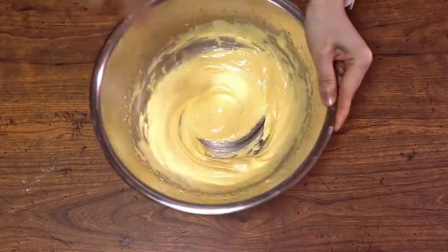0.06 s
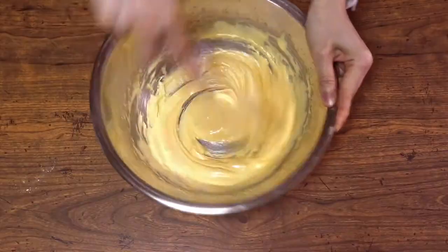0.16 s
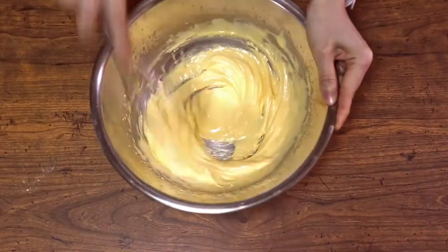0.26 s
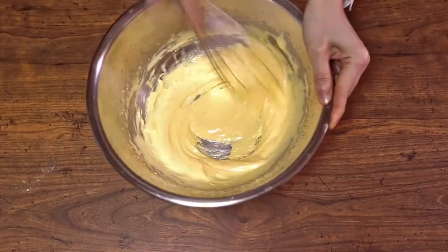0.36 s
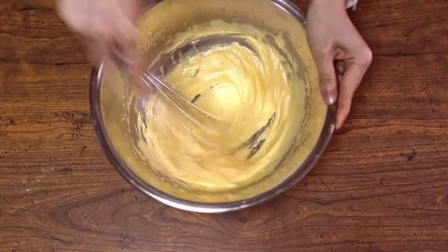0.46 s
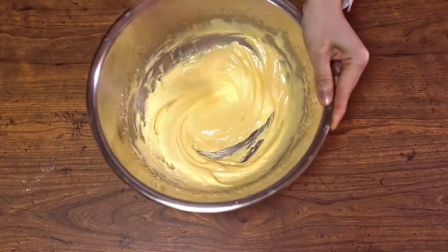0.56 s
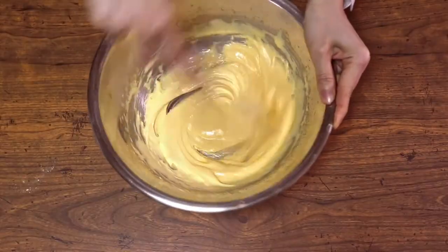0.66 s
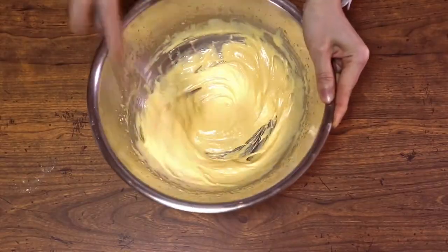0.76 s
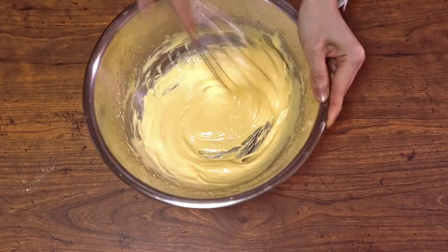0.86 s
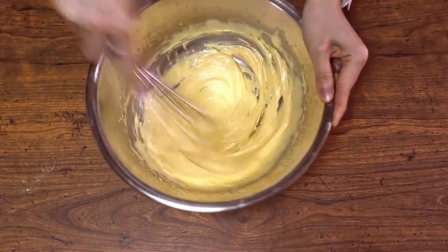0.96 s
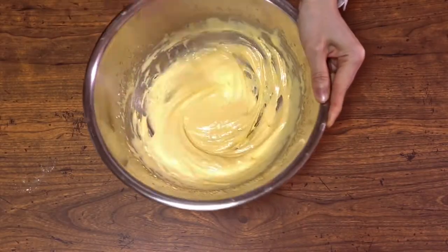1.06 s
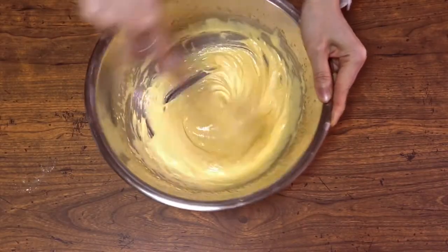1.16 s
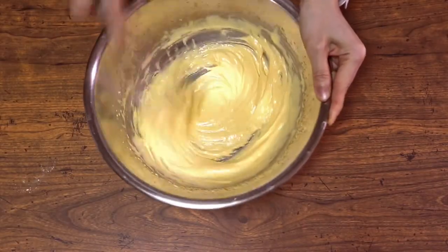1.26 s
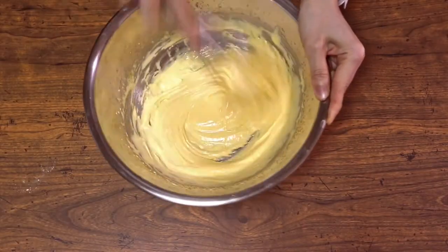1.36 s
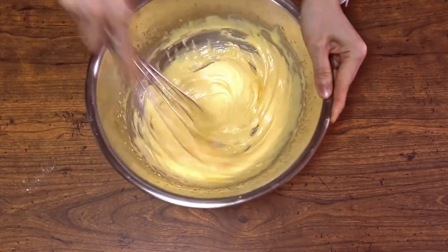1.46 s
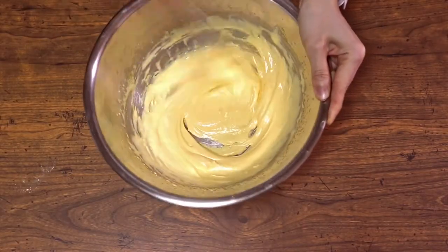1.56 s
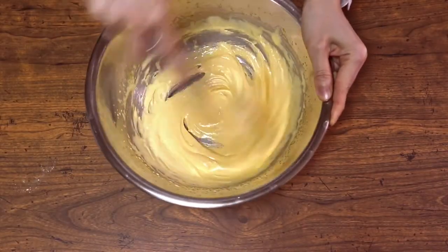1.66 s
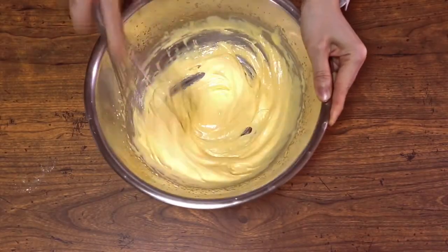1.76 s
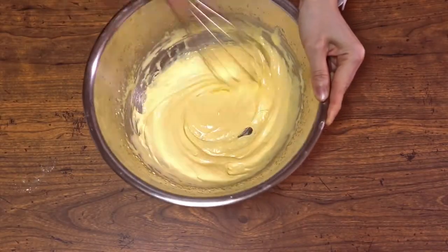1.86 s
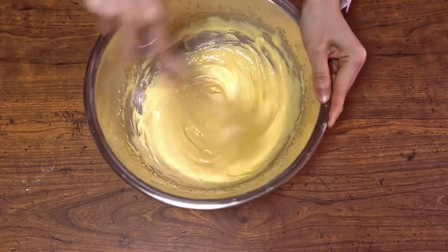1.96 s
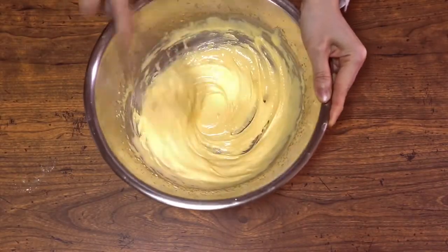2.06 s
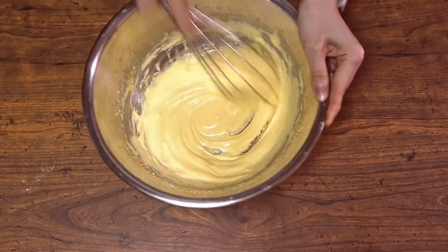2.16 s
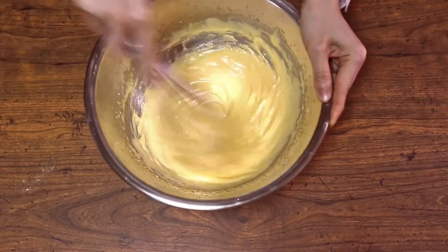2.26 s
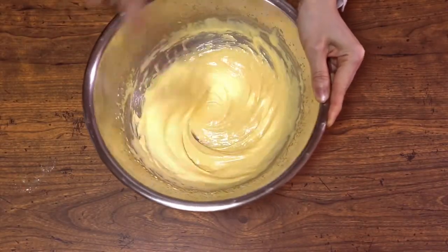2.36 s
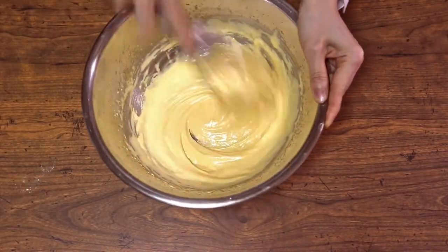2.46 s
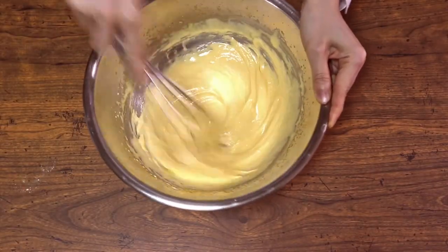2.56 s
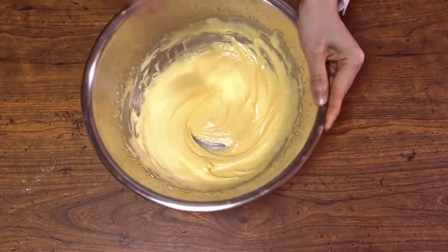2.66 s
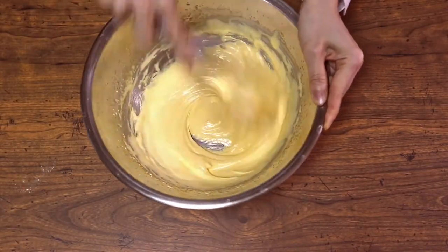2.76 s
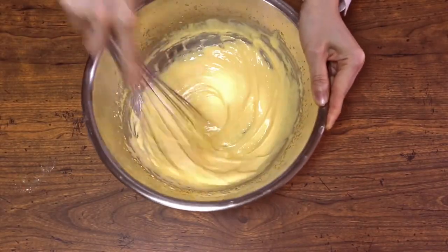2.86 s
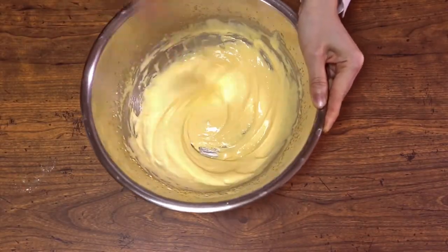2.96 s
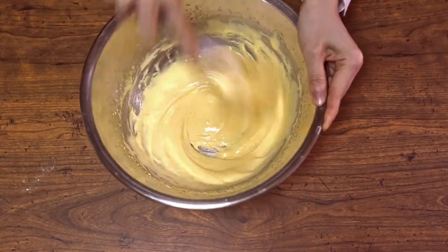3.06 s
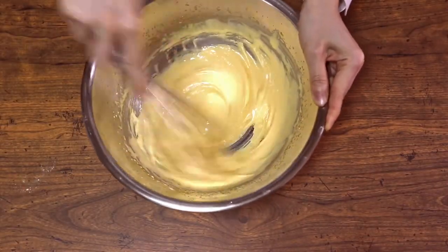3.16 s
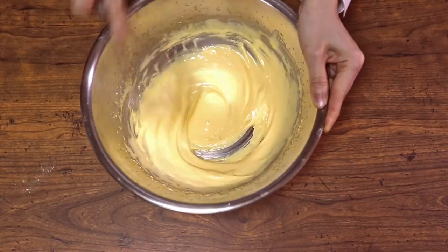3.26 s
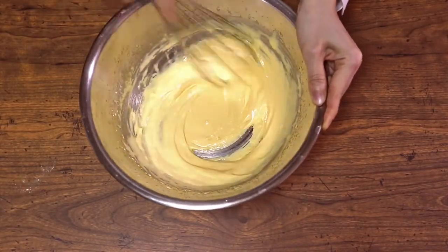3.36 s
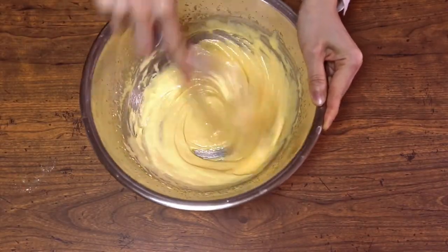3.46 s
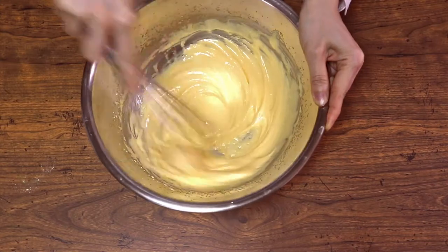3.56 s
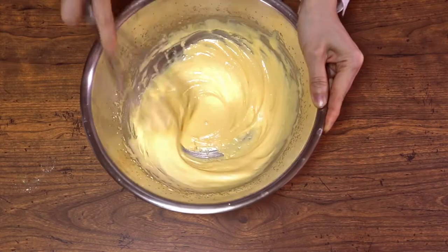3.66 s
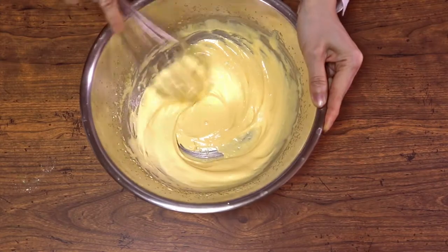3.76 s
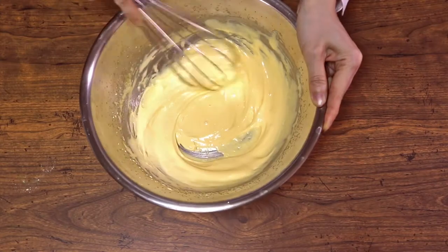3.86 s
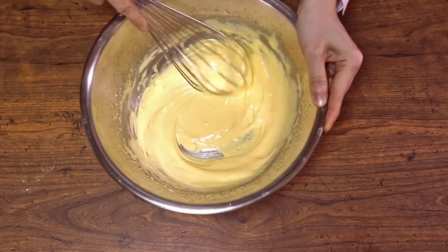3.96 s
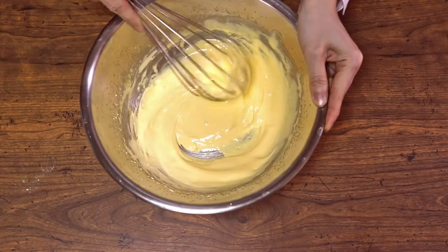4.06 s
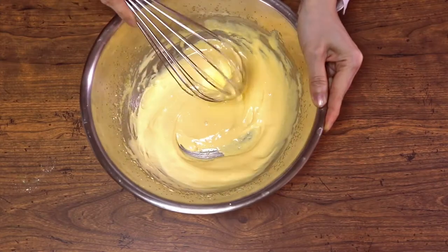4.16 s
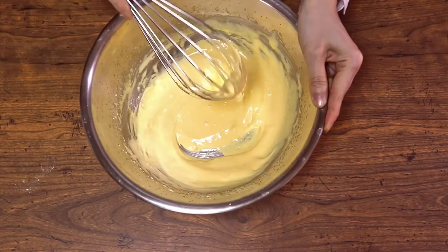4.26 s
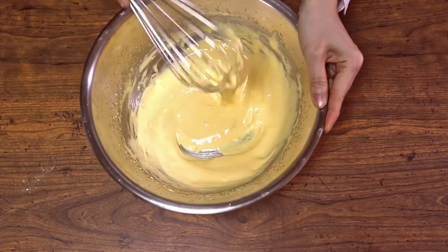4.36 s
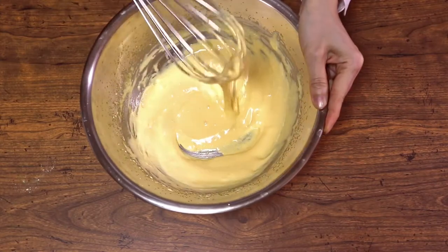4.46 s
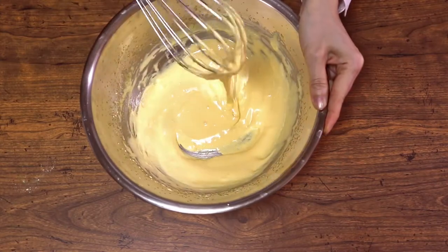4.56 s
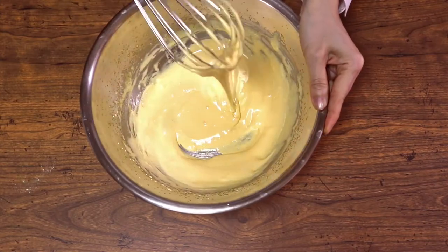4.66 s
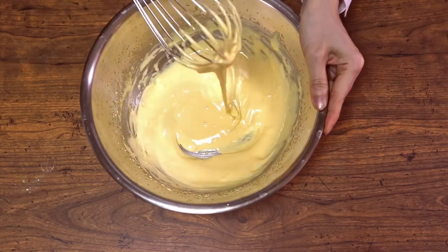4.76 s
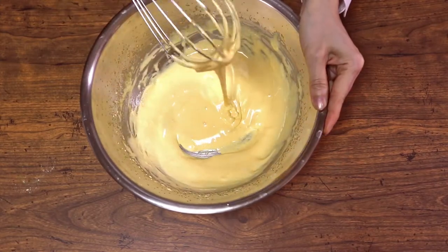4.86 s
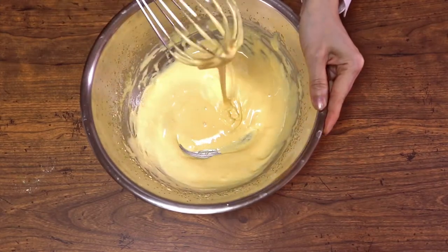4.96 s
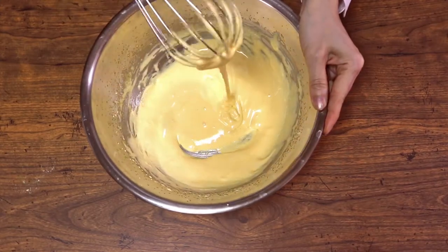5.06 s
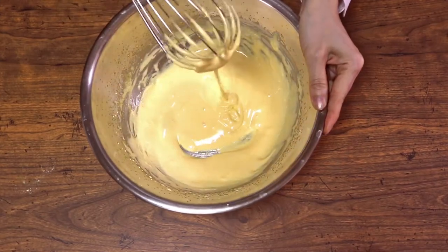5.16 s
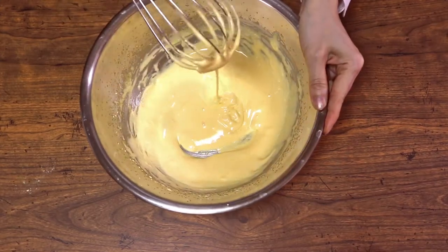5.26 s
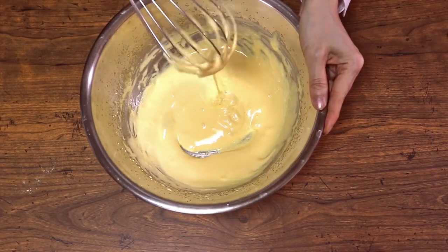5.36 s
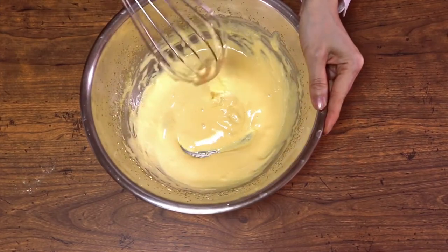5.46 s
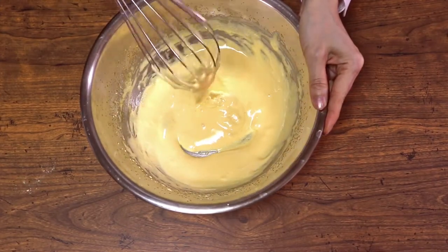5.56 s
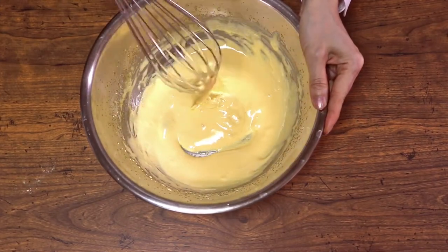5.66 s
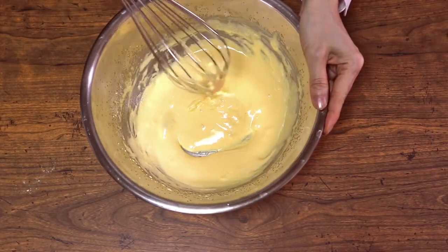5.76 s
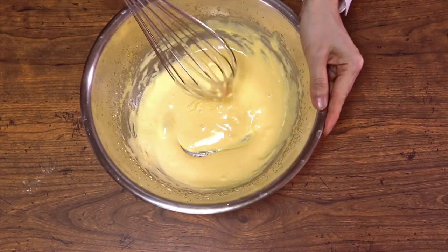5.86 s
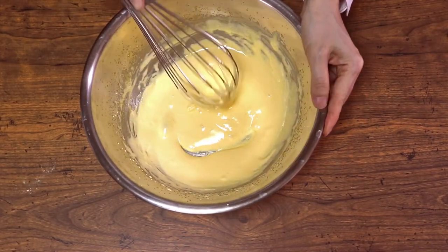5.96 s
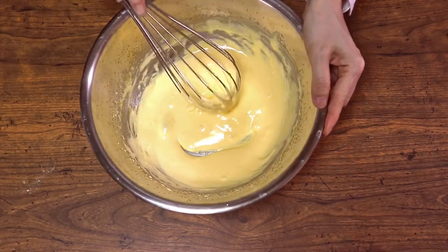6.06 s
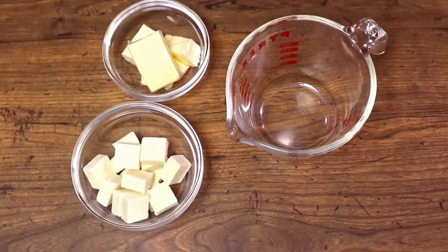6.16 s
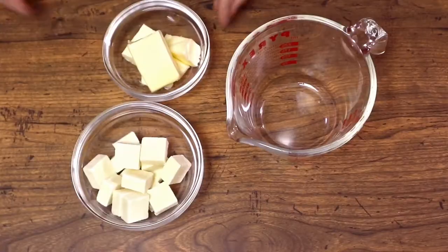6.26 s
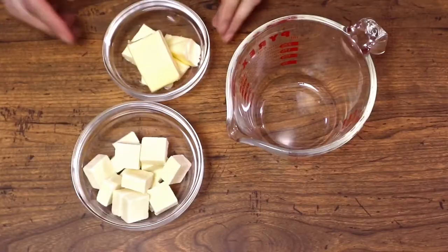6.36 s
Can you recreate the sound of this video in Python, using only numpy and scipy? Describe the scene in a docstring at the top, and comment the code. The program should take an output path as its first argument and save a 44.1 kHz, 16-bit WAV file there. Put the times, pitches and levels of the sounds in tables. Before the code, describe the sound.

Close up, a wire whisk beats yolks in a steel bowl at about four strokes a second: wet squelch, chattering wires, bright pings and foamy fizz, with dull bumps on the wooden table. The beating eases, then stops around four seconds. Wires ring on faintly over quiet kitchen noise and hum; faint crisp taps come late, then a tiny gap and brighter hiss.

```python
"""A wire whisk beats egg yolks in a steel bowl on a wooden table, about four strokes a second.
Swelling grain crowds squelch, rattle and fizz; decaying rings slap, ping, gulp and knock; the sound soon dips
to a brief silence. At 4 s the whisk is lifted: wires ring on, then a low tone glides down over the quiet kitchen.
Its noise and wavering hum stay; the hum swells, a low rush passes and faint taps fall as the whisk is lowered.
A second brief silence follows, then a brighter hiss."""
import sys
import numpy as np
from scipy import signal
from scipy.io import wavfile
from scipy.ndimage import uniform_filter1d, map_coordinates

SR = 44100
rng = np.random.default_rng(int(sys.argv[2]) if len(sys.argv) > 2 else 0)


def wrap_up_sound(samples):
    """Save the sound to the file named by the first command line argument, as 16-bit audio."""
    columns = np.atleast_2d(samples).T
    # keep every value between -1 and 1, then stretch to whole-number steps
    tamed = np.clip(columns, -1, 1)
    steps = np.round(tamed * 32767).astype(np.int16)
    wavfile.write(sys.argv[1], SR, steps)


N = 282681
T = np.arange(N) / SR


def amp(db):
    """Decibels to gain."""
    return 10 ** (np.asarray(db) / 20)


def unit(x):
    """Scales to rms 1."""
    return x / np.sqrt(np.mean(x ** 2) + 1e-20)


def add(mix, s, sound):
    """Lays a sound into the mix at time s."""
    part = mix[max(round(s * SR), 0):][:len(sound)]
    part += sound[:len(part)]


def colour(x, points, size=4096):
    """Causal minimum-phase filter through the (frequency [Hz], gain [dB]) points."""
    hz, db = np.transpose(points)
    bin_hz = abs(np.fft.fftfreq(size, 1 / SR))
    log_gain = np.log(amp(np.interp(np.log(bin_hz + 1), np.log(hz + 1), db)))
    response = np.fft.ifft(np.exp(np.conj(signal.hilbert(log_gain)))).real[:size // 2]
    return signal.oaconvolve(x, response)[:len(x)]


def wander(size, step=32):
    """Slow random curve of rms 1, smooth over about size samples."""
    span = max(int(size / step), 1)
    noise = rng.standard_normal(int(N / step) + 2)
    coarse = uniform_filter1d(uniform_filter1d(noise, span), span)
    return np.interp(T, np.linspace(0, T[-1], len(coarse)), unit(coarse))


def swells(rows):
    """A level that opens and closes softly for each (time [s], length [s], level [dB])."""
    level = np.zeros(N)
    for s, length_s, db in rows:
        add(level, s, amp(db) * signal.windows.tukey(int(length_s * SR), .5))
    return level


def grains(per_s, low_hz, high_hz, cycles, spread_db, patchy_db=0, count=28, size=160, order=7):
    """A crowd of tiny damped rings of random size and pitch; now these pitches prevail, now those."""
    patches = rng.standard_normal((size + 1, order + 1))
    when, kind, luck = rng.random((int(N / SR * per_s), 3)).T
    favour = map_coordinates(patches, [when * size, kind * order], order=1)
    strength = amp(spread_db * np.minimum(-np.log(1 - luck), 4) + patchy_db * favour)
    out = np.zeros(N)
    for k, hz in enumerate(np.geomspace(low_hz, high_hz, count)):
        mine = (kind * count).astype(int) == k
        clicks = np.bincount((when[mine] * N).astype(int), strength[mine], N)
        # two-pole resonator, decaying to 1/e in the given cycles
        r, angle = np.exp(-hz / cycles / SR), 2 * np.pi * hz / SR
        gain = (-1) ** k * hz * np.sin(angle)
        poles = [1, -2 * r * np.cos(angle), r * r]
        out += signal.lfilter([0, gain], poles, clicks - clicks.mean())
    return out


def steadied(x, size=2600):
    """Evens out the slow level and keeps the fine grain."""
    power = uniform_filter1d(uniform_filter1d(x ** 2, size), size)
    return x / np.sqrt(abs(power) + 1e-20)


def dragged(rows, width_hz):
    """Uneven slips keep a wire loop ringing while its pitch slides: narrow noise on a gliding carrier."""
    out = np.zeros(N)
    for s, length_s, first_hz, last_hz, db in rows:
        n = int(length_s * SR)
        smooth = [1], [1, -np.exp(-np.pi * width_hz / SR)]
        wobble = signal.lfilter(*smooth, signal.lfilter(*smooth, rng.standard_normal((2, n))))
        phase = 2 * np.pi * np.cumsum(np.linspace(first_hz, last_hz, n)) / SR
        tone = unit(wobble[0] * np.cos(phase) + wobble[1] * np.sin(phase))
        add(out, s, amp(db) * tone * signal.windows.tukey(n, .5))
    return out


def scatter(x, t60, first, count=700, size=20):
    """Reflections of random sign that die away over t60 [s], from first [s] on, with unit energy."""
    echoes = np.zeros(count * size)
    echoes[np.arange(count) * size + rng.integers(0, size, count)] = rng.choice([-1, 1], count)
    t = T[:len(echoes)]
    echoes *= np.exp(-np.log(1000) * t / t60) * (t > first)
    return signal.oaconvolve(x, echoes / np.linalg.norm(echoes))[:N]


def circling(x, t60, first, cycles_per_s=2.687):
    """Two reflection patterns trade places as the whisk moves from side to side of the bowl."""
    angle = np.pi * cycles_per_s * T
    return scatter(x * np.cos(angle), t60, first) + scatter(x * np.sin(angle), t60, first)


def stereo(mid, side):
    """Left and right from mid and side."""
    return np.array([mid + side, mid - side])


# room air and closing hiss: (frequency [Hz], gain [dB]); their widths: (frequency [Hz], side re mid [dB])
AIR_COLOUR = [(25, -6), (45, -4), (95, 0), (170, -2), (240, -4), (400, -5), (700, -9), (1100, -11),
              (2000, -14), (4000, -19), (8000, -28), (11000, -34.5), (15000, -47)]
AIR_WIDTH = [(40, -21), (100, -10), (200, 0.5), (380, 2.5), (800, 5.5), (2200, 4), (4400, 5), (14000, 6.5)]
HISS_COLOUR = [(35, -23), (60, 0.5), (199, -7), (269, -6.5), (408, -5), (438, -13), (503, -8), (2910, -11),
               (11100, -30.5), (15000, -36)]
HISS_WIDTH = [(40, -22), (200, 1), (1500, -1), (3000, -4), (7000, 2), (14000, 1)]
# hum: (frequency [Hz], rms level [dB])
HUM = [(199.5, -65), (517, -72), (2004, -77.5)]
# rise of the hum, before its rms is set: (time [s], length [s], rise [dB])
HUM_SWELL = (4.9, 1.6, 4.3)
AIR_MID_DB, HISS_MID_DB, HISS_FROM_S = -53.9, -49.5, 6.238


def kitchen(waver_hz=3.6, waver_db=3.0, drift_db=0.66):
    """Drifting coloured noise with wavering hum sines; a brighter hiss takes over at the end."""
    def air(spectrum, width):
        mid, side = (unit(colour(rng.standard_normal(N), spectrum, size=8192)) for _ in range(2))
        return stereo(mid, colour(side, width))
    start_s, length_s, rise_db = HUM_SWELL
    arch = np.sin(np.pi * np.clip((T - start_s) / length_s, 0, 1))
    drift = wander(size=4000)
    swell = amp(waver_db * wander(size=6000) + rise_db * arch)
    hum = 0
    for hz, db in HUM:
        phase = 2 * np.pi * np.cumsum(hz + waver_hz * drift) / SR
        hum = hum + amp(db) * unit(swell * np.sin(phase))
    room = amp(AIR_MID_DB + drift_db * wander(size=5000)) * air(AIR_COLOUR, AIR_WIDTH)
    hiss = amp(HISS_MID_DB) * air(HISS_COLOUR, HISS_WIDTH)
    return hum + np.where(T < HISS_FROM_S, room, hiss)


# low rush: (time [s], length [s], level [dB])
RUSH_SWELL = [(5.18, .36, -59.5)]
# its colour: (frequency [Hz], gain [dB])
RUSH_COLOUR = [(40, -12), (120, 2), (500, -2), (2500, -26), (9000, -55)]


def low_rush():
    """A soft low rush of filtered noise rises and sinks in the quiet."""
    return swells(RUSH_SWELL) * unit(colour(rng.standard_normal(N), RUSH_COLOUR))


# tone as the whisk rises: (time [s], length [s], first pitch [Hz], last pitch [Hz], level [dB])
LOW_TONE = [(4.22, .26, 352, 328, -62.5)]


def low_tone():
    """A faint narrow tone glides down as the whisk rises."""
    return dragged(LOW_TONE, width_hz=30)


# freed wires: (time [s], length [s], first pitch [Hz], last pitch [Hz], level [dB])
FREE_WIRES = [(4.03, 0.41, 2000, 2010, -72), (4.03, .35, 2700, 2680, -76)]


def free_wires():
    """The freed wires ring on faintly as narrow, nearly steady tones."""
    return dragged(FREE_WIRES, width_hz=30)


# rattle of the wires: (frequency [Hz], gain [dB])
RATTLE_COLOUR = [(600, -39.5), (1200, -14.5), (1800, 3), (2150, 0.5), (2700, 1), (3600, -4.5), (4400, -13),
                 (5500, -26.5), (8000, -30)]
# crackle as the whisk is lifted and lowered: (time [s], length [s], level [dB])
DRIPS = [(3.9, 0.68, -66.5), (6.02, 0.27, -62.5)]


def draining():
    """Tiny bubbles burst in the mix that hangs on the wires."""
    return swells(DRIPS) * unit(colour(grains(3000, 890, 5400, cycles=3, spread_db=2.5), RATTLE_COLOUR))


# hollow in the mix, steel wall, sharp edge: (frequency [Hz], gain [dB])
HOLLOW_COLOUR = [(150, -33), (400, -15), (900, -4.5), (2000, -2), (3000, 6.5), (4500, -9), (6000, -18.5),
                 (11000, 20), (15000, -57)]
WALL_COLOUR = [(250, -14.5), (500, -1.5), (750, 4.5), (1050, 9), (1400, 2), (1900, 9.5), (2250, 7.5),
               (2750, 5), (3400, 1), (4200, -10), (6000, -31.5)]
EDGE_COLOUR = [(1500, -21.5), (3200, 9.5), (4300, 8.5), (5500, -3.5), (7000, -3.5), (11500, -10.5),
               (15000, -48)]
SLAP_ENERGY_S = .005  # a slap has the energy of unit rms over this time


def slap(hz, length_s, edge_db, cycles=6.8, wall_db=-2, graze=0.35, weaker=0.63, count=5):
    """One wire grazes, then the rest land in succession; each rings a hollow in the mix and the steel."""
    t = T[:2048]
    order = np.arange(count)
    delays_s = length_s * (order + rng.uniform(-.4, .4, count) * (order > 0)) / count
    weights = np.where(order > 0, weaker ** (order - 1), graze)
    clicks = np.bincount((delays_s * SR).astype(int), weights, len(t))
    ring_cycles = cycles * np.sqrt(length_s / SLAP_ENERGY_S + .3)  # an abrupt slap is smothered sooner
    ring = np.exp(-t * hz / ring_cycles) * np.sin(2 * np.pi * hz * t)
    hollow = np.convolve(clicks, ring)[:len(t)]
    scrape = rng.standard_normal(len(t)) * np.exp(-t / (.5 * length_s + 3e-4))
    body = unit(colour(hollow, HOLLOW_COLOUR)) + amp(wall_db) * unit(colour(clicks, WALL_COLOUR))
    sound = unit(body) + amp(edge_db) * unit(colour(scrape, EDGE_COLOUR))
    return sound * np.sqrt(SLAP_ENERGY_S * SR) / np.linalg.norm(sound)


# taps as the whisk is lowered: (time [s], level [dB], edge re body [dB])
TAPS = [(6.09, -49, -10), (6.0981, -50.5, -12), (6.107, -52, -3)]


def taps(hollow_hz=330, length_s=0.0013):
    """The lowered whisk touches the bowl with faint crisp ticks: short low slaps."""
    out = np.zeros(N)
    for s, db, edge_db in TAPS:
        add(out, s, amp(db) * slap(hollow_hz, length_s, edge_db, cycles=2.0, wall_db=1.0))
    return out


# bowl nudged on the table: (time [s], relative level [dB], pitch [Hz])
THUMPS = [(0.029, -32, 128), (.251, -25.5, 88), (0.321, -32, 94), (.49, -27, 84), (.856, -26, 148),
          (.918, -30, 135), (1.006, -30.5, 98), (1.099, -26, 116), (1.335, -36, 85), (1.466, -34, 140.5),
          (1.888, -39, 90), (2.057, -36, 90), (2.163, -30, 112), (2.435, -34, 105), (2.777, -33.5, 100),
          (2.985, -29, 100), (3.003, -36, 95), (3.057, -33, 130), (3.688, -35, 92), (3.722, -37, 100)]
# table modes: (multiple of the knock pitch, relative level [dB], t60 [s])
TABLE_MODES = [(1, 4.5, 0.061), (1.4, -5.5, .1), (1.85, -11, 0.13)]
# rub of the bowl's foot: (frequency [Hz], gain [dB])
RUB_COLOUR = [(30, -45.5), (60, -3), (90, 5), (125, -4.5), (165, 3), (260, -9.5), (600, -42), (2000, -72)]


def thumps(level_db=2.5, decay_s=0.055, soft_s=0.0015, rub_db=-10, lowest_hz=55):
    """Dull knocks of the bowl: damped table modes under a fading rub of low noise."""
    out, t = np.zeros(N), T[:8192]
    for s, db, hz in THUMPS:
        ring = sum(amp(mode_db - 60 * t / t60) * np.sin(2 * np.pi * hz * ratio * t)
                   for ratio, mode_db, t60 in TABLE_MODES)
        rub = colour(rng.standard_normal(len(t)) * np.exp(-t / decay_s), RUB_COLOUR)
        knock = ring / abs(ring).max() + amp(rub_db) * rub / abs(rub).max()
        add(out, s, amp(db + level_db) * knock * (1 - np.exp(-t / soft_s)))
    return signal.sosfilt(signal.butter(2, lowest_hz, "high", fs=SR, output="sos"), out)


# modes of the bowl, damped by hand and mix: (frequency [Hz], relative level [dB], t60 [s])
BOWL_MODES = [(354.4, 0, 0.263), (449, -6.5, 0.18), (495, -0.5, .13), (555, 1.5, 0.23), (595.3, 2, 0.16),
              (676, 3, 0.2), (726, 1.5, 0.16), (891, 2, 0.18), (934, -9.5, 0.28), (1050, -4, .1),
              (1390, -1.5, .2), (1560, 0.5, 0.14), (1770, -12, 0.11), (2256, -17.5, .07)]


def bowl(x, ring_db=-2.0, shifting_db=3):
    """Contacts also ring the modes of the steel wall, each driven by a randomly drifting amount."""
    t, out = T[:12000], x
    for hz, db, t60 in BOWL_MODES:
        ring = amp(db - 60 * t / t60) * np.cos(2 * np.pi * hz * t) * 2 * np.log(1000) / (t60 * SR)
        drive = x * amp(shifting_db * wander(size=5000))
        out = out + amp(ring_db) * signal.oaconvolve(drive, ring)[:N]
    return out


# single wires singing: (time [s], length [s], first pitch [Hz], last pitch [Hz], relative level [dB])
SQUEAKS = [(1.039, 0.031, 1920, 1990, -26), (1.225, 0.049, 1800, 1990, -28),
           (1.257, 0.064, 1850, 1576, -27.5), (1.459, 0.064, 2950, 3050, -33),
           (1.47, 0.061, 2010, 1900, -33.5), (2.591, 0.07, 1852, 1690, -34), (3.26, 0.091, 1996, 1884, -34),
           (3.658, 0.063, 1900, 2000, -34)]
# wires scraping the bare wall: (time [s], length [s], first pitch [Hz], last pitch [Hz], relative level [dB])
SCRAPES = [(.005, 0.035, 3800, 4380, -25.5), (1.105, 0.022, 3366, 3750, -25),
           (2.57, 0.073, 2700, 2890, -30.5), (2.8, .045, 2850, 3440, -27.5),
           (3.33, 0.065, 3840, 3290, -32.5)]


def squeaks(scrape_db=-1, squeak_width_hz=150, scrape_width_hz=1100):
    """One dragging wire sings a narrow note; several together make a broad scrape."""
    return dragged(SQUEAKS, squeak_width_hz) + amp(scrape_db) * dragged(SCRAPES, scrape_width_hz)


# gulps in the mix, hollow bodies of slaps, a late dull knock:
# (time [s], relative level [dB], middle pitch [Hz], length [s])
LOW_RINGS = [(0.021, -27, 682, 0.032), (0.207, -17.5, 1054, 0.035), (.532, -21, 1160, .015),
             (0.65, -20.5, 870, 0.021), (0.656, -20, 618, 0.041), (0.788, -16.5, 1126, 0.019),
             (0.817, -23, 964, .02), (1.135, -21, 1104, 0.024), (1.278, -22, 524, 0.056),
             (1.387, -19, 880, 0.031), (1.405, -15.5, 930, .025), (1.831, -22, 1408, .028),
             (2.066, -21, 1090, 0.013), (2.078, -28, 546, 0.045), (2.203, -21.5, 737, 0.039),
             (2.367, -13.5, 980, 0.0096), (2.488, -15.5, 1050, .018), (2.717, -21.5, 1310, .018),
             (2.776, -23.5, 392, 0.023), (2.935, -27, 523, 0.033), (3.047, -28, 1080, 0.015),
             (3.135, -16.5, 1022, 0.012), (3.311, -29, 1410, .02), (3.926, -25.5, 851, .02),
             (3.977, -26, 953, 0.02), (3.996, -31, 1378, .03), (6.098, -40.5, 300, 0.014)]


def low_rings(level_db=2, decay_share=0.41, rise_share=0.084, attack_s=0.002):
    """Low damped sines with a rising pitch: gulps in the mix, hollow bodies of slaps, a late dull knock."""
    out, t = np.zeros(N), T[:4096]
    for s, db, hz, length_s in LOW_RINGS:
        turns = np.cumsum(hz * (1 + rise_share * (np.minimum(t / length_s, 1) - .5))) / SR
        shape = (1 - np.exp(-t / attack_s)) * np.exp(-t / (decay_share * length_s))
        add(out, s, amp(db + level_db) * shape * np.sin(2 * np.pi * turns))
    return out


# foam tears: (time [s], length [s], relative level [dB])
SPITS = [(.162, 0.015, -27), (1.019, .012, -29), (1.716, 0.017, -29), (1.74, 0.015, -30),
         (1.969, .012, -32), (2.235, .012, -32), (2.815, 0.022, -30.5), (3.225, .012, -27),
         (3.679, 0.011, -30)]


def spits(level_db=-1):
    """Bright spits: many of the finest bubbles burst at once, separately on each side."""
    spray = np.array([unit(grains(6000, 8800, 11600, cycles=6, spread_db=1.5, count=8)) for _ in range(2)])
    return amp(level_db) * swells(SPITS) * spray


# fizz of the foam: (frequency [Hz], gain [dB])
FIZZ_COLOUR = [(2000, -26), (4000, 6), (5500, 2.5), (6250, 3), (6850, 7), (7500, 0.5), (9200, 2),
               (11700, 0.5), (13000, -6), (14500, -18), (15600, -43)]
# wire strikes bare steel: (time [s], relative level [dB], tick re ring before trim [dB], pitch [Hz])
PINGS = [(0.0238, -6.5, -8.5, 6800), (0.0356, -4.5, -7, 7135), (0.1316, -9, -13, 6820),
         (.378, -12.5, 1, 6860), (0.3865, -15, -8, 6930), (.399, -12, -8, 6930), (0.4112, -11, -6, 6900),
         (.5645, -19, -12, 6826), (.644, -18.5, 8, 6950), (.8906, -16, 5, 6800), (.9128, -16, -8, 7000),
         (1.1016, -19, 7, 6900), (1.16, -17, -10, 6690), (1.38, -16.5, 0, 6850), (1.403, -25, 8, 6850),
         (1.448, -20, -10, 6550), (1.609, -14.5, -4, 6940), (1.746, -24.5, 12, 7000),
         (1.8915, -13, -3, 6920), (1.9069, -13.5, 6.5, 7100), (2.18, -21, -8, 6815), (2.213, -20, 1, 6940),
         (2.741, -11, -0.5, 6830), (2.8995, -24, -8, 6910), (3.0373, -4, -11.5, 6820),
         (3.078, -16, -13, 6900), (3.3743, -9, -8, 6790), (3.3938, -12, -5, 6930), (3.527, -17, -14, 6520),
         (3.577, -19, -8, 6600), (3.6415, -19, -10, 6858), (3.858, -28, -10, 6858), (3.976, -29, 3, 6880)]
PING_LEFT_DB, PING_RIGHT_DB = -12, 0.5  # the bare steel is on the right


def pings(wires, decay_s=0.0028, rise_s=0.000228, ring_db=-1, tick_db=-4, tick_decay_s=0.0026,
          light_db=-21, flare_db=4, room_db=-11, lag_s=.0007):
    """A struck wire rings briefly with a bright noise tick; lighter touches tinkle in random flurries."""
    out, t = np.zeros(N), T[:2048]
    for s, db, bright_db, hz in PINGS:
        ring = np.sin(2 * np.pi * hz * t) * np.exp(-t / decay_s) * (1 - np.exp(-t / rise_s))
        tick = colour(rng.standard_normal(len(t)) * np.exp(-t / tick_decay_s), FIZZ_COLOUR)
        add(out, s + lag_s, amp(db) * (amp(ring_db) * ring + amp(tick_db + bright_db) * tick))
    tinkle = unit(grains(160, 6400, 7200, cycles=17, spread_db=2, count=12))
    flurries = amp(light_db + flare_db * np.tanh(wander(size=2000)))
    out = out + flurries * wires * tinkle
    return np.array([amp(db) * out + amp(room_db) * scatter(out, t60=0.16, first=0.0029)
                     for db in (PING_LEFT_DB, PING_RIGHT_DB)])


LIFT_S, LIFT_DB_PER_S = 3.995, 330
SLIPS_PER_S, SLIP_MEAN_S, SLIP_LOW_HZ, SLIP_HIGH_HZ, SLIP_GLIDE_SHARE = 36, .016, 1598, 4000, .1


def slips(wires, level_db=-10.5, spread_db=2, width_hz=110):
    """Single wires catch on the wall at random; each sings a short note that slides as it bends."""
    rows = []
    for when, span, pitch, bend, luck in rng.random((int(SLIPS_PER_S * LIFT_S), 5)):
        hz = SLIP_LOW_HZ * (SLIP_HIGH_HZ / SLIP_LOW_HZ) ** pitch
        last_hz = hz * (1 + SLIP_GLIDE_SHARE * (2 * bend - 1))
        db = spread_db * (2 * luck - 1)
        rows.append((when * LIFT_S, SLIP_MEAN_S * (.5 + span), hz, last_hz, db))
    return amp(level_db) * wires * dragged(rows, width_hz)


LIGHT_PER_S, LIGHT_LOW_HZ, LIGHT_HIGH_HZ = 16, 1000, 2800
LIGHT_LOW_DB, LIGHT_HIGH_DB = -7, -3  # re the strength of the wires


def light_slaps(wires, length_s=0.00394, edge_db=-11):
    """Smaller slaps at random moments follow the strength of the stroke they fall in."""
    out = np.zeros(N)
    for when, pitch, luck in rng.random((int(LIGHT_PER_S * LIFT_S), 3)):
        hz = LIGHT_LOW_HZ * (LIGHT_HIGH_HZ / LIGHT_LOW_HZ) ** pitch
        db = LIGHT_LOW_DB + (LIGHT_HIGH_DB - LIGHT_LOW_DB) * luck
        add(out, when * LIFT_S, amp(db) * slap(hz, length_s, edge_db))
    return wires * out


# slaps through the mix: (time [s], relative energy over 5 ms [dB], hollow pitch [Hz], length [s])
SLAPS = [(0.026, -18.5, 2730, 0.0064), (0.133, -19.5, 2410, 0.0018), (0.151, -21, 1910, .003),
         (0.196, -21, 1300, 0.0021), (0.218, -17, 1760, 0.0056), (0.28, -19.5, 2800, 0.0026),
         (0.303, -20, 1510, 0.0063), (0.3557, -13, 1870, 0.0027), (0.388, -21, 2700, 0.0022),
         (0.4084, -17.5, 2040, 0.0024), (0.537, -17.5, 2320, 0.001), (0.599, -13.5, 2310, 0.0041),
         (0.672, -20, 2310, 0.0075), (0.713, -23, 1430, 0.0032), (0.723, -17, 2000, 0.0034),
         (0.788, -18.5, 2600, 0.0034), (0.8443, -15, 1700, 0.0049), (.881, -17, 2400, 0.0026),
         (0.891, -15, 2330, 0.0061), (0.957, -17, 1055, 0.0052), (1.021, -17.5, 2370, 0.0073),
         (1.1035, -11.5, 2380, 0.0023), (1.121, -13.5, 3120, 0.0024), (1.233, -16, 1860, 0.0064),
         (1.279, -15, 2700, 0.0024), (1.342, -13, 2010, .002), (1.3452, -11.5, 2350, 0.0063),
         (1.4024, -16, 1820, .004), (1.433, -16.5, 2859, 0.0024), (1.5916, -14.5, 2080, 0.0036),
         (1.61, -16.5, 2900, 0.00085), (1.6985, -15.5, 2520, 0.00402), (1.713, -18, 2880, 0.0041),
         (1.846, -21.5, 1500, 0.0024), (1.941, -24, 1937, 0.0019), (1.977, -23.5, 1698, 0.0016),
         (2.068, -16, 1112, 0.0049), (2.106, -27, 3046, .0015), (2.15, -25, 1440, 0.0042),
         (2.181, -21, 2640, 0.0038), (2.198, -20, 1090, 0.0047), (2.306, -26, 2000, .0015),
         (2.366, -17.5, 1766, .0016), (2.431, -18.5, 2500, 0.0068), (2.463, -22.5, 2579, 0.0029),
         (2.486, -22, 2280, 0.002), (2.719, -19.5, 2660, 0.0019), (2.752, -18, 1570, 0.0048),
         (2.925, -21.5, 1000, 0.0038), (2.957, -24.5, 1954, 0.0021), (3.004, -21, 1700, 0.0025),
         (3.038, -21, 2630, 0.0017), (3.048, -23, 2330, 0.0053), (3.081, -24, 1440, 0.0038),
         (3.1354, -18, 2700, 0.0034), (3.242, -25.5, 2730, 0.0025), (3.375, -23, 2290, 0.0018),
         (3.396, -25, 2150, 0.003), (3.502, -22, 985, 0.0025), (3.526, -22, 2600, 0.004),
         (3.595, -19, 1000, 0.0031), (3.62, -22.5, 1750, 0.0026), (3.647, -25.5, 2471, 0.0028),
         (3.861, -31, 2400, 0.0033), (3.884, -29.5, 3047, .0015), (3.977, -25.5, 2540, 0.0031),
         (3.9888, -26.5, 2440, 0.00095), (4.009, -32, 1300, .004)]


def slaps(level_db=-1.5, edge_db=-12, edge_db_per_octave=5, middle_hz=2000):
    """The loud clacks of the whisk; the higher the hollow's pitch, the sharper the edge."""
    out = np.zeros(N)
    for s, db, hz, length_s in SLAPS:
        sharpness_db = edge_db + edge_db_per_octave * np.log2(hz / middle_hz)
        add(out, s, amp(db + level_db) * slap(hz, length_s, sharpness_db))
    return out


# brief changes of contact, mostly drops: (time [s], length [s], drop [dB], negative is a slight rise)
CONTACT_CHANGES = [(0.307, .034, 6), (0.545, 0.05, 2.5), (1.768, 0.047, 2), (2.015, 0.046, -0.5),
                   (2.383, .03, 2), (3.428, 0.066, 4)]


def contact():
    """Gain of the whisk's contact, which briefly drops or slightly rises."""
    drop_db = np.zeros(N)
    for s, length_s, db in CONTACT_CHANGES:
        add(drop_db, s, db * signal.windows.tukey(int(length_s * SR), .5))
    return amp(-drop_db)


# push and swing back: (time [s], squelch [relative dB], rattle [relative dB], fizz [relative dB],
# swing back after [s], swing back re push [dB])
STROKES = [(-0.025, -29.5, -22, -27, 0.15, -5.5), (0.108, -26, -30.5, -41, 0.072, 0.5),
           (0.345, -24, -22.5, -30, 0.094, -1.5), (0.617, -23, -25, -30, 0.14, -4),
           (0.85, -22, -23, -29, 0.09, -6.5), (1.097, -23, -25, -30.5, 0.12, -5.5),
           (1.345, -23.5, -24, -30.5, 0.024, -12), (1.572, -23.5, -26, -30, 0.063, -16),
           (1.8, -30.5, -28.5, -33.5, 0.063, 0.5), (2.142, -24.5, -26, -34.5, 0.12, -11),
           (2.393, -30.5, -28, -33.0, 0.14, -2.5), (2.7, -24.5, -24.5, -31.5, 0.2, -12),
           (3.002, -27, -30, -33, 0.078, -5), (3.263, -34, -35.5, -40.5, 0.084, 5),
           (3.472, -30, -31.5, -33.5, 0.11, -6.5), (3.827, -39, -35, -45, 0.21, -12)]
SWELL_S, MIX_LAG_S = 0.029, 0.018  # the mix gives way just after the wires arrive
SQUELCH_DECAY_S, RATTLE_DECAY_S, FIZZ_DECAY_S = 0.09, 0.21, 0.26
# gentle stirring at time 0, easing off
STIR_SQUELCH_DB, STIR_RATTLE_DB, STIR_FIZZ_DB, EASING_DB_PER_S = -33, -28.5, -35, 1.64
# the last slow turn hardly stirs up the foam, and the wires leave it first
FOAM_SETTLES_S, FOAM_SETTLES_DB_PER_S, FOAM_LEFT_S = 3.58, 9.5, 3.965


def strokes(push_db, stir_db, decay_s, lag_s=0):
    """Strength of one layer: easing stir plus a swell for each push and swing back, until the lift."""
    def swell(s):
        age = T - s - lag_s
        return np.clip(age / SWELL_S, 0, 1) * np.exp(-np.maximum(age - SWELL_S, 0) / decay_s)
    power = amp(stir_db - EASING_DB_PER_S * T) ** 2
    for (s, *_, back_s, back_db), db in zip(STROKES, push_db):
        power = power + (amp(db) * swell(s)) ** 2 + (amp(db + back_db) * swell(s + back_s)) ** 2
    lift = amp(-LIFT_DB_PER_S * np.maximum(T - LIFT_S - lag_s, 0))
    return np.sqrt(power) * contact() * lift


def effort():
    """How strongly the strokes drive the mix, the wires and the foam."""
    _, wet_db, wires_db, foam_db, _, _ = np.transpose(STROKES)
    settling_db = FOAM_SETTLES_DB_PER_S * np.maximum(T - FOAM_SETTLES_S, 0)
    leaving_db = LIFT_DB_PER_S * np.maximum(T - FOAM_LEFT_S, 0)
    return (strokes(wet_db, STIR_SQUELCH_DB, SQUELCH_DECAY_S, MIX_LAG_S),
            strokes(wires_db, STIR_RATTLE_DB, RATTLE_DECAY_S),
            strokes(foam_db, STIR_FIZZ_DB, FIZZ_DECAY_S) * amp(-settling_db - leaving_db))


# squelch of the mix: (frequency [Hz], gain [dB])
SQUELCH_COLOUR = [(60, -20), (100, 1.5), (200, -7), (280, -11.5), (380, -2.5), (600, 0.5), (1100, 2.5),
                  (1450, 0.5), (2000, -17), (3500, -23.5)]


def beating(wet, wires, foam, squelch_db=-2.5, rattle_db=-4.5, jangle_db=-9.5, fizz_db=-2.0,
            wet_flutter_db=1.5, wire_flutter_db=1.7, foam_flutter_db=1.5):
    """Wet pockets collapse, wires chatter on the steel and foam bursts, all following the strokes."""
    # rattle and fizz flutter together; the squelch flutters on its own
    shared_flutter = wander(size=700)
    wet = wet * amp(wet_flutter_db * wander(size=700))
    wires = wires * amp(wire_flutter_db * shared_flutter)
    foam = foam * amp(foam_flutter_db * shared_flutter)
    pockets = grains(1100, 208.0, 1878, cycles=3.33, spread_db=2.5, patchy_db=4.0)
    squelch = steadied(colour(pockets, SQUELCH_COLOUR))
    chatter = grains(1400, 1198, 5480, cycles=5.4, spread_db=3, patchy_db=3.0)
    rattle = steadied(colour(chatter, RATTLE_COLOUR))
    # wires that swing free ring for longer
    swinging = grains(130, 1400, 3200, cycles=26, spread_db=3, count=40)
    jangle = steadied(colour(swinging, RATTLE_COLOUR), size=5000)
    # foam bursts all round the bowl: separate bubbles for each side
    bubbles = [grains(8000, 3560, 14500, cycles=3.8, spread_db=3, patchy_db=2.5) for _ in range(2)]
    fizz = np.array([steadied(colour(x, FIZZ_COLOUR)) for x in bubbles])
    churn = amp(squelch_db) * wet * squelch + wires * (amp(rattle_db) * rattle + amp(jangle_db) * jangle)
    return churn, np.sqrt(2) * amp(fizz_db) * foam * fizz


# side filter for the contacts: (frequency [Hz], side gain [dB])
SIDE_COLOUR = [(50, -43), (200, -36), (450, -32), (750, -22), (1100, -31), (2100, -54), (2800, -18.5),
               (3500, -23), (5000, -11), (7000, 1), (14000, -27)]


def scene(room_db=-7.0, fizz_room_db=-9, far_side_db=-2, shared=0.064):
    """The bowl in a small room: scattered reflections, filtered into the side, differ left and right."""
    wet, wires, foam = effort()
    churn, fizz = beating(wet, wires, foam)
    contacts = churn + slaps() + light_slaps(wires) + slips(wires) + squeaks() + taps()
    near = bowl(contacts) + low_rings() + thumps() + draining()
    mid = near + amp(room_db) * circling(near, t60=0.33, first=.006) + low_tone() + free_wires()
    close_side = circling(mid, t60=0.015, first=0)
    far_side = amp(far_side_db) * circling(mid, t60=0.217, first=0.0036)
    side = colour(close_side + far_side, SIDE_COLOUR)
    foam_pair = fizz + shared * fizz[::-1] + spits()
    bubbles = np.array([x + amp(fizz_room_db) * scatter(x, t60=0.22, first=0.0033) for x in foam_pair])
    return stereo(mid, side) + bubbles + pings(wires) + kitchen() + low_rush()


# the whole sound drops out: (time [s], length of the silence [s], fade to either side [s])
DROPOUTS = [(0.087, 0.014, 0.037), (6.237, 0.0021, 0.033)]
BAND_LIMIT_HZ = 15600


def record(dry):
    """Two brief fades to silence, then a linear-phase low-pass."""
    faded = dry
    for s, length_s, fade_s in DROPOUTS:
        faded = faded * np.clip(np.maximum(s - T, T - s - length_s) / fade_s, 0, 1)
    low_pass = signal.firwin(511, BAND_LIMIT_HZ, window=("kaiser", 9), fs=SR)
    return signal.oaconvolve(faded, low_pass[None], "same")


dry = scene()
out = record(dry)
wrap_up_sound(out)
```